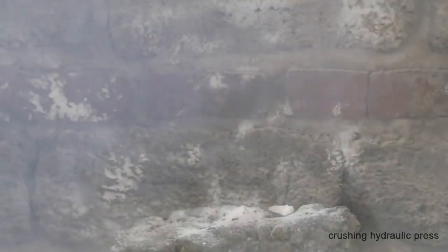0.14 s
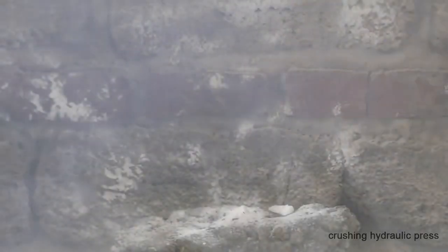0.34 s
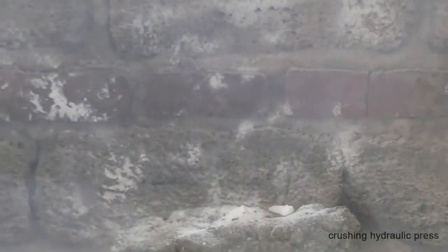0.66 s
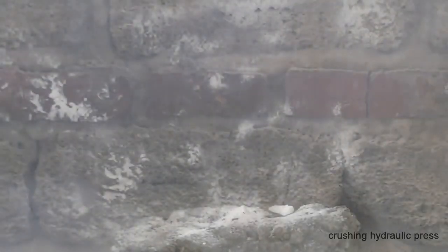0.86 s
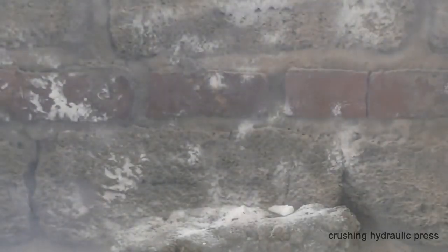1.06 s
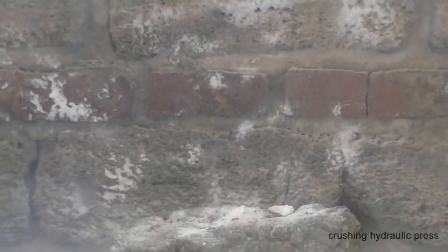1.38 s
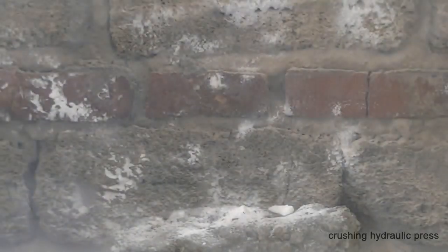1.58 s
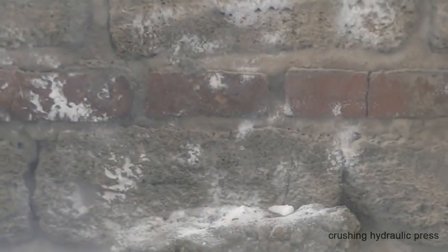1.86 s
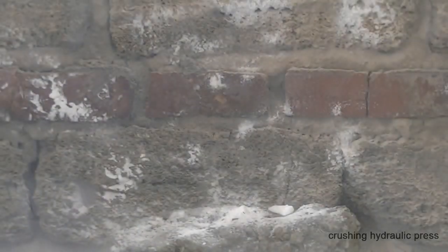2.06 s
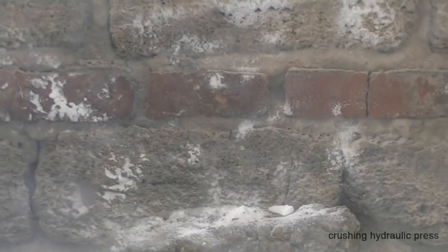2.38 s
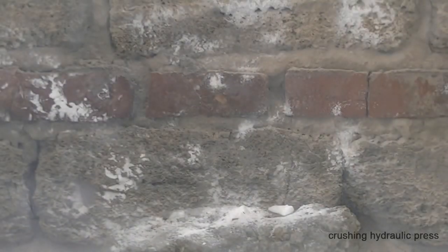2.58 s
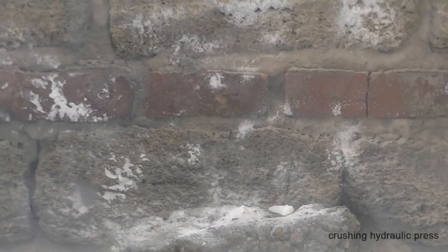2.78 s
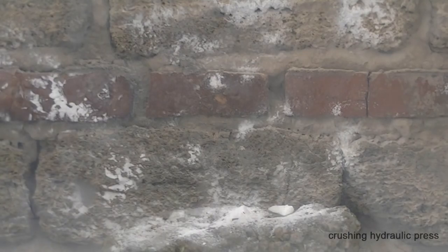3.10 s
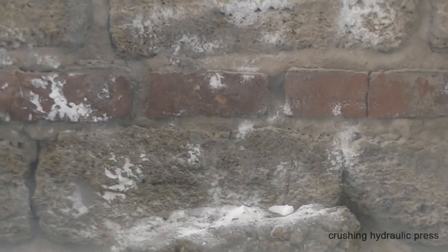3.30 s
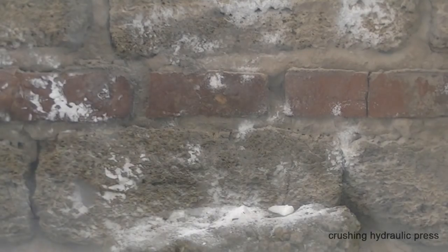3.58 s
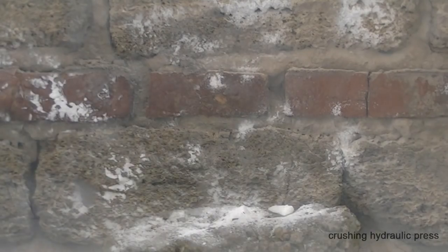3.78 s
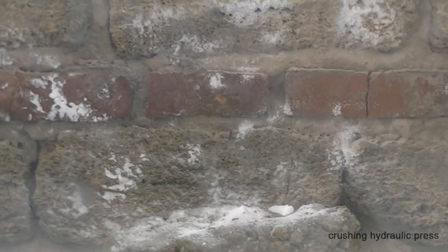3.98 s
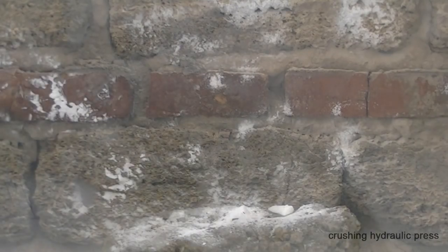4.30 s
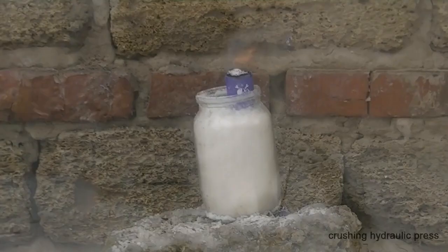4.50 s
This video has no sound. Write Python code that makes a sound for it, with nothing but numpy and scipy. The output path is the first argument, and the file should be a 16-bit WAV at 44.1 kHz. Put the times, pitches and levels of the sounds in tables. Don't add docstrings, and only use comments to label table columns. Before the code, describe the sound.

After a blast, glass shards and debris clatter onto a thin panel and stone, dense at first, then sparse clicks over quiet air.

```python
import sys
import numpy as np
from scipy import signal
from scipy.fft import rfft, irfft, next_fast_len
from scipy.io import wavfile

SR = 44100
rng = np.random.default_rng(int(sys.argv[2]) if len(sys.argv) > 2 else 0)


def transcribe(signal):
    frames = np.atleast_2d(signal).T
    limited = np.clip(frames, -1, 1)
    pcm = np.round(limited * 32767).astype(np.int16)
    wavfile.write(sys.argv[1], SR, pcm)


def magnitude_from_level(level_db):
    exponent = np.asarray(level_db, float) / 20
    return 10 ** exponent


N = 204934


def unit(x):
    return x / np.sqrt(np.mean(x ** 2) + 1e-20)


def along(points, hz):
    f, v = np.transpose(points)
    return np.interp(np.log(hz + 1), np.log(f + 1), v)


def coloured(x, points, causal=False):
    m = 2 * next_fast_len(N // 2 + 4096)
    level_db = along(points, np.fft.rfftfreq(m, 1 / SR))
    gain = magnitude_from_level(np.maximum(level_db, -120))
    if causal:
        cepstrum = irfft(np.log(gain), m)
        cepstrum[1:m // 2] *= 2
        cepstrum[m // 2 + 1:] = 0
        gain = np.exp(rfft(cepstrum))
    return irfft(rfft(x, m) * gain, m)[:N]


def add_at(out, s, sound):
    out[round(s * SR):][:len(sound)] += sound


def rings(hz, db, t60, t, attack=0.00058):
    hz, db, t60 = (np.asarray(v)[:, None] for v in (hz, db, t60))
    partials = magnitude_from_level(db - 60 * t / t60) * np.sin(2 * np.pi * hz * t)
    return np.sum(partials, axis=0) * (1 - np.exp(-t / attack))


def crackle(rate, spread_db, life):
    hit = rng.random(N) < rate / SR
    sizes = hit * magnitude_from_level(2 * spread_db * np.minimum(rng.exponential(1, N), 3))
    burst = magnitude_from_level(-60 * np.arange(SR // 20) / SR / life)
    power = signal.fftconvolve(sizes, burst ** 2)[:N]
    return np.sqrt(np.abs(power)) * rng.standard_normal(N)


def resonant_noise(peaks, tilt_db, size):
    f = np.fft.rfftfreq(size, 1 / SR)
    power = sum(magnitude_from_level(2 * db) * (f * w) ** 2 / ((c * c - f * f) ** 2 + (f * w) ** 2) for c, w, db in peaks)
    gain = power ** .5 * magnitude_from_level(tilt_db(f + 1))
    return unit(irfft(rfft(rng.standard_normal(size)) * gain, size))


# [Hz, dB per Hz]
AIR_COLOUR = [(25, -39), (326, -17.5), (554, -15), (684, -3.5), (916, -2.5), (1970, -7), (2440, -5.5),
              (3730, -7.5), (4030, -10), (5120, -11), (14000, -26)]
# [Hz, dB per Hz]
PORT_HISS_COLOUR = [(25, -39), (256, -11), (429, -3), (756, 2), (861, 6), (930, 0), (1560, 2.5),
                    (7540, -19), (12000, -79.5)]


def air():
    return magnitude_from_level(-66) * unit(coloured(rng.standard_normal(N), AIR_COLOUR + [(16300, -53.0)]))


def port_hiss():
    return magnitude_from_level(-69) * unit(coloured(rng.standard_normal(N), PORT_HISS_COLOUR))


# [Hz, dB per Hz]
PATTER_COLOUR = [(710, -46.5), (1200, -15), (1560, 5), (1810, -20.5), (2350, -1.5), (4700, -7.5),
                 (9110, -16.5), (14000, -33.5), (16000, -53.5)]
# [Hz, dB per Hz]
SCRAPE_COLOUR = [(88, -69.5), (150, -35), (492, -1.5), (898, -18.5), (1170, -6), (2010, -7.5), (2550, -22),
                 (3270, -13.5), (3730, -23.5), (5000, -29.5), (6500, -39), (11000, -120)]
# [s, dB]
GRIT_FALL = [
    (0, -37.5),
    (.168, -50.5),
    (.392, -50.5),
    (.646, -52.5),
    (1.046, -58.5),
    (1.55, -61.5),
    (1.75, -63.5),
    (2.35, -70.5),
    (4.647, -75),
]
# [s, s, dB]
SLIDES_OF_BITS = [
    (2.896, 0.091, -48),
    (2.996, 0.072, -50.5),
    (3.155, 0.08, -57.5),
    (3.308, 0.096, -62),
    (3.503, 0.2, -55.5),
    (4.463, 0.096, -60.5),
    (2.772, 0.8, -60),
    (4.61, 0.11, -61),
]


def grit():
    t = np.arange(N) / SR
    fall = magnitude_from_level(np.interp(t, *np.transpose(GRIT_FALL)))
    slide = np.zeros(N)
    for start, length, db in SLIDES_OF_BITS:
        slide += magnitude_from_level(db) * np.sin(np.pi * np.clip((t - start) / length, 0, 1)) ** 0.85
    patter = unit(coloured(crackle(rate=600, spread_db=2.9, life=.011), PATTER_COLOUR, causal=True))
    scrape = unit(coloured(crackle(rate=450, spread_db=2.6, life=.025), SCRAPE_COLOUR, causal=True))
    clumps = unit(coloured(crackle(rate=420, spread_db=3, life=.022), SCRAPE_COLOUR, causal=True))
    shaken_db, scrape_rest_db = -18, -75
    return (fall + magnitude_from_level(shaken_db) * slide) * patter + (fall + magnitude_from_level(scrape_rest_db)) * scrape + slide * clumps


def tinks(count=420):
    when, pitch, size = rng.random((3, count, 1))
    s, hz, t = when * N / SR, 1500 * 4.5 ** pitch, np.arange(SR // 40) / SR
    db = np.interp(s, *np.transpose(GRIT_FALL)) + 4 + 14 * size ** 2
    ping = magnitude_from_level(db - 60 * t * hz / 65) * np.sin(2 * np.pi * hz * t)
    sample = (s * SR + t * SR).astype(int)
    return np.bincount(sample.ravel(), ping.ravel(), N + SR)[:N]


# [s, dB, Hz, s]
SHARD_PINGS = [(.001, -27, 4370, 0.064), (.030, -24.5, 5880, 0.033), (0.1322, -6.5, 2640, 0.011),
               (0.351, -19.5, 434, 0.028), (0.389, -10, 2440, 0.0092), (.620, -29, 1560, 0.027),
               (.683, -36, 3200, 0.03), (0.7093, -22, 1800, 0.028), (4.108, -38, 860, 0.031),
               (4.1088, -36, 1570, 0.032), (1.089, -36, 5460, 0.016), (1.387, -30, 1580, 0.032),
               (1.434, -35, 3620, 0.022), (1.884, -43, 4270, .025), (1.919, -39, 7500, .015),
               (2.206, -35, 6600, 0.017), (2.848, -47, 1290, 0.018), (3.049, -39, 680, 0.024),
               (2.548, -42, 3600, .01), (3.33, -41, 1680, 0.016), (3.831, -33, 3314, 0.029),
               (4.488, -42.5, 1890, .025)]
# [s, dB, s]
CLEAR_CRACKS = [(0.0414, -10.5, 0.029), (0.055, -14, 0.0068), (0.1221, -21.5, 0.017), (0.1312, -14, 0.022),
                (0.3509, -15.5, 0.022), (0.3627, -22, 0.0098), (0.3893, -0.5, 0.0074),
                (0.4198, -3.5, 0.0097), (0.422, -13, 0.02), (0.587, -10.5, 0.015), (0.599, -30, 0.011),
                (0.71, -11.5, 0.016), (0.7238, -17.5, 0.012), (0.736, -16.5, 0.035), (0.8088, -9.5, 0.03),
                (0.8146, -10.5, 0.0046), (1.1221, -29.5, 0.014), (1.2043, -24.5, 0.025),
                (1.2797, -32.5, 0.032), (1.383, -31.5, 0.018), (1.4585, -31.5, 0.011),
                (1.6298, -35.5, 0.015), (1.7009, -37, 0.021), (1.7921, -32, 0.022), (1.863, -35, 0.028),
                (2.0409, -33.5, 0.012), (2.1974, -34, 0.01), (2.6947, -26.5, 0.014), (2.8019, -30.5, 0.01),
                (2.8074, -38.5, 0.019), (2.8596, -29.5, 0.015), (3.2636, -26, 0.019)]
# [Hz, dB]
CRACK_TONES = [
    [(950, -18), (1550, -1.5), (2070, 0), (2700, -13), (3870, -11.5)],
    [(1660, 3), (2930, -17), (4020, -16), (5440, -5), (6300, -15)],
    [(1570, -4.5), (2340, 16), (3010, -10), (4010, -11), (5200, -1)],
    [(560, -9), (1550, -6.5), (2060, 4), (2660, -7), (3900, -9.5)],
    [(1560, -6), (2090, -1.5), (2690, -4), (3880, -6.5), (5370, -11.5)],
    [(1610, -1.5), (3650, -8), (5180, -2), (5740, -1), (6700, 1)],
    [(5060, -5), (5580, 3.5), (6350, -10), (7120, -4.5), (8010, -9.5)],
    [(3650, -2), (4410, -12), (5570, -15.5), (6320, -4), (7400, -6)],
    [(3100, -1.5), (3850, -12.5), (5640, -4), (6210, -6.5), (7180, -1)],
    [(1560, -4.5), (2080, 2), (2960, -4), (3880, -7.5), (5460, -10.5)],
    [(1400, 14.5), (2070, 4), (3090, 2.5), (5360, -8), (6690, 9)],
    [(3310, -6.5), (3920, -9.5), (4680, -0.5), (5870, -7.5), (6590, 1)],
    [(2400, 2.5), (3330, -3), (3940, 9), (4920, -2.5), (6660, 2)],
    [(3260, -20), (4110, 2), (4840, -2.5), (5570, -6), (6350, -10.5)],
    [(2870, -5.5), (4310, -13), (5000, -11.5), (5680, -3.5), (6470, -5.5)],
    [(1580, -3), (2340, -18.5), (2860, -18.5), (4250, 6.5), (5640, 1)],
               [(1250, -10.5), (2380, -11), (3600, 2), (5430, -8), (6540, -5)],
    [(2330, 1), (3010, -1), (5160, -3), (6030, -9), (6840, -4)],
    [(2360, -1.7), (3180, -1.2), (4090, -2), (4820, 0.0023), (6210, 0.85)],
    [(2060, -2), (4480, 5), (5280, -8), (7220, 3), (8050, -3)],
    [(1610, -22), (2250, 1), (2790, -5), (3370, -1), (4190, -15)],
    [(2130, -5), (4550, 2), (5080, -11), (5580, -3), (6610, 1)],
    [(2930, -14), (4320, 2), (5120, -1), (5780, -1), (7190, 3)],
    [(1530, -13), (2610, -17), (3210, 2), (4100, -7), (5660, -18)],
    [(2060, -5.5), (3190, -13), (3960, 0.5), (4470, -9), (5200, -1.5)],
    [(1340, 1), (2510, -1), (3610, 2.5), (5090, 5), (5930, -1)],
    [(1410, -0.5), (2140, -2.5), (3220, -1), (4080, 4.5), (5190, -21.5)],
    [(620, -3), (2480, -8.5), (3520, -1.5), (4010, -5.5), (6090, -1.5)],
    [(1270, 1.5), (2110, 5.5), (2940, -3), (3700, -16), (4430, -17)],
    [(1300, -4), (2080, -6), (2770, -8.5), (3280, -6), (3810, -6.5)],
    [(1270, -3.5), (2710, -13), (3290, -4.5), (3810, 6), (5010, -8)],
    [(1580, -6), (2140, -1.5), (3370, -3.5), (4060, -9.5), (4590, -23.5)],]


def cracks():
    out, t = np.zeros(N + SR), np.arange(SR // 12) / SR
    for (s, db, t60), tones in zip(CLEAR_CRACKS, CRACK_TONES):
        hz, level_db = np.transpose(tones)
        modes = np.array([hz, level_db, 0.77 * t60 * (hz / 3000) ** -.2])
        forward = rings(*modes[:, ::2], t, attack=0.00025)
        backward = rings(*modes[:, 1::2], t, attack=0.00068)
        add_at(out, s, magnitude_from_level(db + 4.5) * (forward - backward))
    for s, db, hz, t60 in SHARD_PINGS:
        add_at(out, s, rings([hz], [db], [t60], t, attack=0.00026))
    return out[:N]


def yard(x, t60):
    t = np.arange(SR // 4) / SR
    tail = rng.standard_normal(SR // 4) * magnitude_from_level(-60 * t / t60)
    return signal.fftconvolve(np.pad(x, (90, 0)), tail / np.linalg.norm(tail))[:N]


# [Hz, Hz, dB]
PANEL_MODES = [(1590, 70, 0), (2110, 110, -2), (2320, 60, -2), (2930, 160, 0), (3230, 60, -2),
               (4050, 250, -3), (2600, 3000, -11), (5600, 1800, -4), (8000, 3000, -13)]
# [Hz, dB, s]
HOLLOW_MODES = [(459.6, 1.5, 0.11), (637.5, -0.5, 0.055), (870.3, 2.5, 0.3), (322.6, -1.5, 0.081)]
CRACK_RATIOS = [1, 0.59, 0.753, 1.148, 1, 1.27, 2, 1.1]
# [s, dB, Hz, dB]
LUMP_HITS = [(.009, -18, 4220, -12), (.034, -25, 2600, -1), (.054, -19.5, 1560, -16),
             (0.146, -19.5, 2040, -12), (.351, -13, 2080, -17), (.551, -34.5, 1280, 2.5),
             (.587, -10.5, 2110, -13.5), (0.598, -22.5, 1500, -40), (.868, -29, 2500, -11),
             (0.978, -28.5, 3730, -7.5), (1.508, -46.5, 1630, 5), (1.618, -33, 2260, -23),
             (1.66, -37, 1940, -4.5), (1.767, -37, 2100, -8.5), (2.306, -43, 2080, -27),
             (2.694, -24.5, 3220, -17.5), (2.801, -32.5, 1280, -12.5), (2.934, -34, 2040, -28),
             (3.185, -39, 1740, -10.5), (4.085, -37, 2140, -13.5), (4.504, -44, 1890, -24.5)]
# [s, dB, Hz, dB]
CHIP_HITS = [(.0417, 5, 2020, -43), (0.104, -18.5, 2220, -45), (.131, -7, 2180, -31),
             (.736, -12, 4240, -12), (1.05, -40, 3200, -5), (1.3325, -31.5, 4240, -4.5),
             (1.353, -29.5, 3960, -10), (1.412, -31, 2000, -13), (1.461, -37.5, 3240, -12),
             (1.472, -45.5, 1610, 3.5), (1.708, -28.5, 2320, -12), (1.782, -33, 2000, -32),
             (1.792, -33, 3370, -32), (2.02, -32.5, 2180, -31), (2.042, -20.5, 3640, -27),
             (2.198, -20.5, 3010, -21), (2.242, -34.5, 2150, -19), (2.711, -48.5, 3150, -32),
             (2.859, -15.5, 2540, -24.5), (2.902, -33, 1450, -12), (3.197, -31.5, 3630, -23),
             (3.209, -31.5, 1760, -26.5), (3.263, -16, 2200, -48), (3.328, -30.5, 1500, -31.5),
             (3.831, -34.5, 3080, -22), (4.095, -30, 1504, -17), (4.581, -30.5, 2360, -14)]
# [s, dB, Hz, dB]
BURST_HITS = [(.067, -28, 1390, -0.5), (.122, -16.5, 1830, -1.5), (0.4206, -6, 3740, -13.5),
              (0.4232, -14, 3860, -20), (.443, -17.5, 3070, -8), (0.563, -28, 2180, -5.5),
              (.953, -31, 3430, -4), (1.017, -33, 3000, 5.5), (1.088, -36.5, 2180, -6.5),
              (1.15, -35.5, 3370, -1.5), (1.194, -24.5, 1580, -4.5), (1.2782, -26, 2320, -7.5),
              (1.55, -41, 1360, -4.5), (1.7, -30, 5200, -4), (2.41, -39.5, 3120, -8.5),
              (2.651, -53.5, 2100, -0.5), (3.543, -37, 1330, -10)]
# [s, dB, Hz, dB]
SPECK_HITS = [
    (0.092, -30.5, 2540, -14),
    (0.336, -34.5, 2030, -22),
    (0.382, -42, 4770, -16),
    (0.629, -33, 4060, -3.5),
    (0.8102, -26, 2880, -23),
    (1.253, -43, 4070, -6),
    (1.594, -47, 1450, -18),
    (1.919, -48, 1240, -22),
    (2.128, -49, 1210, -26.5),
]
# [s, dB, Hz, dB]
CLOD_HITS = [(0.19, -43, 2080, -9), (.236, -40, 2270, 7), (.27, -39.5, 1620, 1.5), (.505, -41, 2180, -17),
             (0.89, -46.5, 1560, -19), (2.953, -43, 1400, -11), (3.034, -47.5, 1321, 2.5),
             (3.471, -47, 1580, -4.5), (3.561, -48, 1420, 0.5), (3.706, -51.5, 1605, -28),
             (4.485, -59, 1910, -8)]
# [s, dB, Hz, dB]
SPLINTER_HITS = [(0.7358, -18, 4200, -27), (0.363, -30, 1640, -33), (0.3896, -3.5, 5140, -14.5),
                 (0.535, -29.5, 4060, -20), (0.71, -6, 2280, -29), (0.724, -11, 4260, -12),
                 (0.809, -1.5, 2740, -29), (0.919, -31.5, 3570, -12), (1.111, -33.5, 4160, -4),
                 (1.122, -32, 3700, -43), (1.203, -26, 2320, -8), (1.384, -26.5, 4360, -14),
                 (1.4207, -33.5, 3650, -5), (1.629, -34.5, 4450, -12), (1.86, -36.5, 3960, -8),
                 (1.953, -37.5, 5200, -9.5), (1.979, -44.5, 3100, -7), (2.063, -34, 2230, -25),
                 (2.115, -39, 2010, -14), (2.2052, -33.5, 2950, -8), (2.349, -35.5, 3870, -14),
                 (2.373, -37, 4400, -14), (4.04, -47.5, 2190, -4.5)]
# [dB, dB, dB]
KIND_LEVELS = [
    (-3.5, -24, -35),
    (0, -13.5, -25),
    (0, -32, -6),
    (-4.5, -15, -7),
    (2.5, 3.5, -31.5),
    (-6, -12, 3.5),
]


def landings():
    out, t = np.zeros(N + SR), np.arange(SR // 5) / SR
    brief = t[:SR // 20]
    hollow = [(hz, 4 / t60, db) for hz, db, t60 in HOLLOW_MODES]
    panel_hz, panel_width, panel_db = np.transpose(PANEL_MODES[:6])
    ratios = np.array(CRACK_RATIOS)
    ratio_db = -11 * np.abs(np.log2(ratios)) ** .6
    clear_times = np.transpose(CLEAR_CRACKS)[0]
    kinds = [CHIP_HITS, LUMP_HITS, SPLINTER_HITS, BURST_HITS, CLOD_HITS, SPECK_HITS]
    pieces = [(*row, *levels) for rows, levels in zip(kinds, KIND_LEVELS) for row in rows]
    chance = rng.standard_normal((len(pieces), 3, 20))
    for (s, db, hz, splash_db, crack_db, thud_db, sparkle_db), (a, b, c) in zip(pieces, chance):
        detune = 1 + 0.12 * a[:8] * (np.arange(8) > 0)
        shard_hz = np.clip(hz * ratios * detune, 1150, 12e3)
        crack = rings(shard_hz, ratio_db + 1.5 * b[:8], 20 / shard_hz + .0035, brief, attack=.0005)
        sparkle_hz = np.clip(9500 * np.exp(0.304 * a[8:]), 5e3, 16e3)
        sparkle = rings(sparkle_hz, 3 * b[8:], np.full(12, .011), brief, attack=0.00021)

        def near_db(f):
            return -6.5 * np.abs(np.log2(f / hz))

        splash = resonant_noise(PANEL_MODES, near_db, size=len(t))
        splash = splash * magnitude_from_level(-60 * t / 0.11) * (1 - np.exp(-t / 0.00024))
        splash = splash * magnitude_from_level(4 * np.interp(t, .006 * np.arange(8), c[12:]))
        tinkle_db = panel_db + 1.5 * near_db(panel_hz) + 4 * c[:6]
        tinkle = rings(panel_hz * (1 + .006 * c[6:12]), tinkle_db, 7 / panel_width, t)
        panel = magnitude_from_level(-1.5) * splash + magnitude_from_level(-8) * tinkle
        thud = resonant_noise(hollow, np.zeros_like, size=len(t))
        thud = thud * magnitude_from_level(-60 * t / 0.1) * (1 - np.exp(-t / 0.0011))

        if np.min(np.abs(clear_times - s)) < .003:
            crack_db, sparkle_db = crack_db - 6.5, sparkle_db - 1
        sparkle_db = sparkle_db - 1 * s
        piece = magnitude_from_level(splash_db) * panel + magnitude_from_level(thud_db - 1.5) * thud
        piece[:len(brief)] += magnitude_from_level(crack_db) * crack + magnitude_from_level(sparkle_db) * sparkle
        piece[:2] += magnitude_from_level(21 + sparkle_db) * np.array([1, -1])
        add_at(out, s, magnitude_from_level(db) * piece)
    return out[:N]


# [s, dB, s]
CURVED_PIECES = [
    (0.122, -38, .1),
    (0.421, -22.5, 0.13),
    (.711, -21.5, 0.1),
    (.737, -25.5, 0.053),
    (.81, -25.5, 0.14),
    (1.202, -33, 0.073),
    (1.699, -41, 0.045),
]


def shimmer(count=38):
    out, t = np.zeros(N + SR), np.arange(SR // 5) / SR
    for (s, db, t60), (a, b) in zip(CURVED_PIECES, rng.random((len(CURVED_PIECES), 2, count))):
        a, b = np.append(a, a), np.append(b, b[::-1] + 2.3)
        hz = (1200 + 6800 * a) * np.repeat([1, 1.83], count)
        level_db = -2.5 * np.log2(hz / 3000) ** 2 - 8 * b - 3
        add_at(out, s, magnitude_from_level(db) * rings(hz, level_db, t60 * (1.2 - 0.15 * a), t))
    return out[:N]


RINGER_TIMES = [
    .737,
    1.203,
    4.096,
    2.694,
    3.263,
    4.581,
    3.472,
    .42,
    .809,
]
RINGER_LEVELS = [-21.5, -31.5, -35, -17, -34, -25.5, -38, -16, -10.5]
# [Hz, dB, s]
SHARD_MODES = [
    [(1610, -2.5, 0.061), (2320, -8.5, 0.085), (3400, -9, 0.17), (3790, 3.5, 0.052), (4000, -10.5, .086),
     (5700, -9.5, 0.061)],
    [(2320, -2, 0.048), (3070, 3, 0.092), (3960, 3, 0.049), (5360, 2, 0.033)],
    [(855, -0.5, 0.055), (1543, 6.5, 0.052)],
    [(776, -1.5, 0.011), (1400, -9.5, 0.016)],
    [(1560, -7, 0.074)],
    [(547, -2.3, 0.019), (1420, -0.85, 0.026), (1810, -0.5, 0.022), (2900, -0.24, 0.02)],
    [(462, 0.0041, 0.18)],
]
# [Hz, dB, s]
JAR_BASE_MODES = [(452, -6, .18), (1200, -9, .1), (1599, -8, .11), (2116, -12, .17), (2315, -11, .14),
                  (2702, -12, .16), (2993, 0, .16), (3241, -11, .17), (3494, -9, .13), (3790, -6, .1),
                  (4274, -11, .16), (4834, -19, .17), (5690, -18, .17)]
# [Hz, dB, s]
JAR_NECK_MODES = [(1470, -14, .09), (1599, -8, .092), (2320, -12, .12), (2864, 0, .093), (2993, -8, .1),
                  (3644, -17, .11), (3967, -15, .16), (4140, -12, .11), (5286, -12, .14), (5599, -9, .084),
                  (4565, -14, .12), (6578, -19, .1), (7967, -24, .11)]


def ringers():
    out, t = np.zeros(N + SR), np.arange(SR // 3) / SR
    ground_db = -3.9 * (t / 0.14) ** 2
    for s, db, modes in zip(RINGER_TIMES, RINGER_LEVELS, SHARD_MODES + [JAR_BASE_MODES, JAR_NECK_MODES]):
        hz, level_db, t60 = np.transpose(modes)
        song = rings(hz, level_db, np.minimum(t60, .17), t, attack=0.001)
        add_at(out, s, magnitude_from_level(db + ground_db) * song)
    return out[:N]


# [s, dB, Hz, s]
INSECT_CHIRPS = [(1.073, -51, 3250, 0.016), (1.153, -57, 3270, 0.039), (1.296, -54, 3280, 0.031),
                 (3.871, -55, 3190, 0.035), (3.923, -54.5, 3216, 0.028), (4.352, -57.5, 3210, 0.028),
                 (3.912, -62, 4030, .015), (3.951, -62.5, 4050, 0.016), (4.031, -61, 3980, 0.016),
                 (4.11, -61.5, 4066, 0.018), (4.153, -64, 4030, .015), (4.234, -62, 4020, .016),
                 (4.314, -64, 4030, .015), (4.6, -65, 4160, 0.043)]


def insects():
    out = np.zeros(N + SR)
    for s, db, hz, length in INSECT_CHIRPS:
        t = np.arange(round(length * SR)) / SR
        tremble = np.cumsum(rng.normal(0, 0.043, len(t)))
        swell = np.sin(np.pi * t / length) ** .5
        add_at(out, s, magnitude_from_level(db) * swell * np.sin(2 * np.pi * hz * t + tremble))
    return out[:N]


# [Hz, dB]
MIC_RESPONSE = [(60, -16.5), (150, -26), (250, -14.5), (400, -5.5), (5000, -6), (9000, -13.5), (13000, -29),
                (15300, -35), (16600, -75)]
# [Hz, dB]
PORT_DIFFERENCE = [(120, -17), (350, -39), (870, -12.5), (1500, -22), (5000, -15.5)]


def scene():
    falling = landings() + ringers() + shimmer() + cracks()
    falling = coloured(falling, MIC_RESPONSE, causal=True)
    near = falling + magnitude_from_level(-15.0) * yard(falling, t60=0.13) + grit()
    mid = near + insects() + air()
    scatter = yard(near, t60=0.0059) + magnitude_from_level(-4.5) * yard(near, t60=.04)
    side = coloured(scatter, PORT_DIFFERENCE, causal=True) + port_hiss()
    mid = mid + coloured(tinks(), MIC_RESPONSE, causal=True)
    return np.array([mid + side, mid - side])


def roll_off(x):
    return signal.sosfilt(signal.butter(12, 16470, fs=SR, output="sos"), x)


# [s, s]
LEVEL_DIP = (4.59, 0.0056)


def record(dry):
    s, half_width = LEVEL_DIP
    dip = np.clip(np.abs(np.arange(N) / SR - s) / half_width, .05, 1)
    return roll_off(dry * dip)


dry = scene()
out = record(dry)
transcribe(out)
```